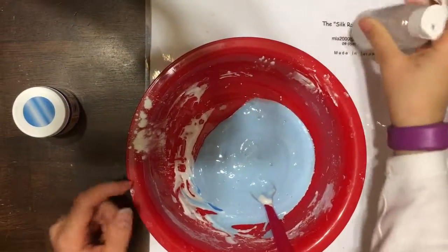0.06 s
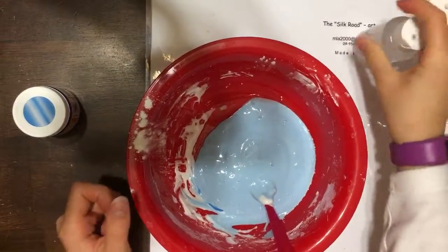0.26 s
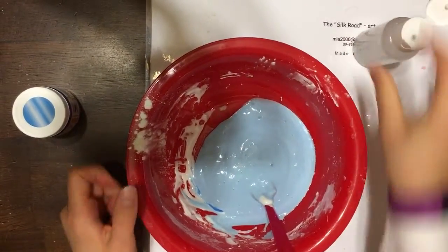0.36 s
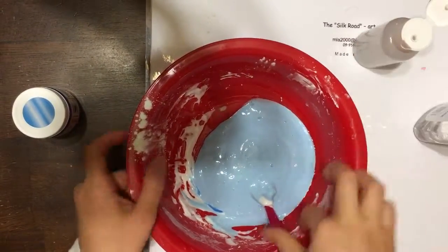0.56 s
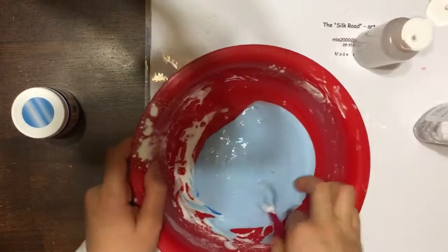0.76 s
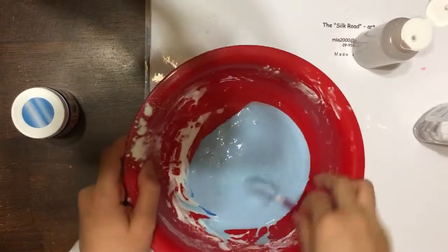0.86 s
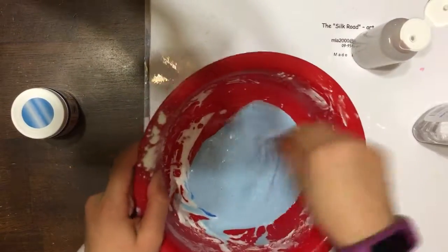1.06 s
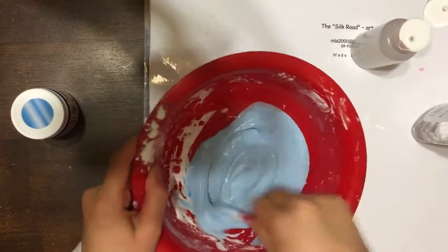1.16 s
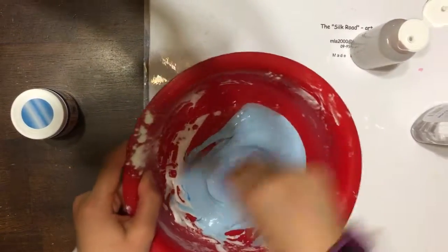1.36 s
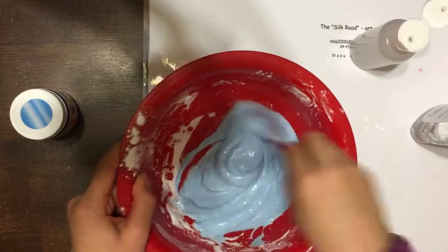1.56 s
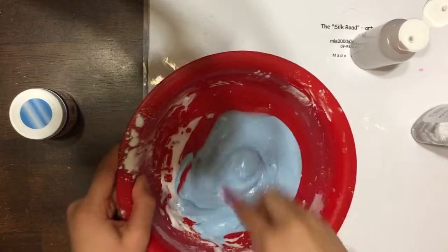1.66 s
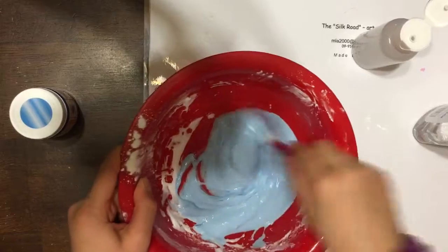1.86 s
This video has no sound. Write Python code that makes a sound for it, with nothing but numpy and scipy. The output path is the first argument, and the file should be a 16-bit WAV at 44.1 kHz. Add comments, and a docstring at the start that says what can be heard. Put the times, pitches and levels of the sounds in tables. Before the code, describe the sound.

Close up indoors, thick slime squelches and crackles faintly as a spoon stirs it, with a few wet pops; beforehand, a light plastic bottle lands with a loud thud and quick rattle on the table.

```python
"""Stirring a bowl of slime

A plastic bottle is set down on a wooden table and rocks twice: ringing modes with short noise bursts.
Fingers and a spoon tap plastic as filtered noise bursts; the bowl knocks as modes and drags as low noise.
The slime peels in showers of tiny rings over a soft crackle, and air pockets pop as sinking tones.
A small, quiet room answers with a brief noise-built echo, over a faint, steady room tone."""
import sys
import numpy as np
from scipy import signal
from scipy.fft import rfft, irfft
from scipy.io import wavfile

SR = 44100
rng = np.random.default_rng(int(sys.argv[2]) if len(sys.argv) > 2 else 0)


def dump_mix(stems):
    """Bounce the given channels to the path in sys.argv[1] as a 16-bit WAV at rate SR."""
    frames = np.atleast_2d(stems).T  # one column per channel
    limited = np.clip(frames, -1, 1)  # hard clip at full scale
    pcm = np.round(limited * 32767).astype(np.int16)
    wavfile.write(sys.argv[1], SR, pcm)


N = 83790
T = np.arange(N) / SR  # time axis [s]

# Bottle meeting the table: (time [s], thud level [dB], bottle ring level [dB], tick level [dB])
BOTTLE_LANDINGS = [(0.2062, -14.5, -31, -44.5), (0.2408, -28, -43.5, -55), (0.2780, -30, -55.5, -61.5)]
# Table top modes: (frequency [Hz], level within the thud [dB], t60 [s])
TABLE_MODES = [(244, 3.5, 0.02), (398, -12.5, 0.0092), (81.4, -35.5, 0.77), (118.5, -18, 0.4),
               (166.5, -15.5, 0.23), (211.5, -22, 0.17), (238, -26, 0.23), (285, -18, 0.13),
               (343.4, -23.5, 0.26), (368.6, -30, 0.32), (426.5, -25, 0.1), (512, -38, 0.23),
               (812, -31, 0.27), (872, -33.5, .22)]
# Bottle shell modes: (frequency [Hz], level within the ring [dB], t60 [s])
BOTTLE_MODES = [(1045, -9.5, 0.029), (1335, -12, 0.048), (1875, -24, 0.058), (2193, -6, .025),
                (3607, -7.5, 0.021), (3630, -6.5, 0.012), (5870, -7, 0.0063)]
THUD_LAG_S, THUD_RISE_S = 0.00134, 0.00097  # the table top gives way just after the contact
THUD_LOW_HZ = 98  # the table top radiates little below this
TICK_HZ, TICK_OCTAVES, TICK_T60_S = 7400, 2.0, 0.018
# The bottle's many crowded modes, as one noise burst; level relative to the ring
CLATTER_DB, CLATTER_HZ, CLATTER_OCTAVES, CLATTER_T60_S = -20, 1940, 0.64, 0.24

# Slime peeling from spoon and bowl:
# (time [s], rise [s], fall time constant [s], hollow level [dB], smack level [dB], fizz level [dB])
PEELS = [(0.816, 0.014, 0.0057, -43, -51.5, -64.5), (0.8403, 0.00056, 0.0051, -50, -59.5, -74),
         (0.881, 0.0015, .006, -58, -61, -74), (0.9, 0.0018, 0.013, -59.5, -71, -72.5),
         (1.008, 0.018, 0.075, -73, -75.5, -79), (1.068, 0.021, 0.03, -75, -97, -83),
         (1.165, 0.037, 0.015, -65.5, -68.5, -83), (1.1795, 0.00084, 0.0021, -77, -59, -67),
         (1.278, .025, 0.015, -58, -72, -87), (1.413, 0.012, 0.01, -68, -60.5, -88),
         (1.538, 0.0027, 0.0083, -48, -56, -78), (1.624, 0.03, 0.017, -77, -79, -67.5),
         (1.708, 0.024, 0.02, -76, -73.5, -65.5)]
# Hollow body, wet smack and fine fizz of the peeling slime, each made of grain families:
# (centre frequency [Hz], pitch spread [octaves], relative level [dB], t60 [s])
HOLLOW_GRAINS = [(374, .4, -16, 0.075), (1140, 0.55, -10, 0.011), (1600, 0.21, 3, 0.0088),
                 (2460, 0.3, -4, 0.0053)]
SMACK_GRAINS = [(3550, 0.47, -2.5, 0.0047), (6400, 0.58, -5, 0.0044)]
FIZZ_GRAINS = [(9700, 0.47, 0.21, 0.0013), (13400, 0.27, -2, 0.0021)]
GRAINS_PER_S, GRAIN_SPREAD_DB = 2000, 3

# Air pockets popping, the last four levels relative to the pop level:
# (time [s], start frequency [Hz], glide [octaves/s], swell time [s], pop level [dB],
#  lower mode level [dB], skin ring level [dB], snap level [dB], push level [dB])
POCKET_POPS = [(1.0661, 1565, -52, 0.0016, -36, -3.5, -28, -21, -1.5),
               (1.562, 1774, -34, 0.0019, -30.5, -10.5, -13, -22, -26),
               (1.5698, 1837, -180, 0.0023, -35.5, -12.5, -6.5, -12.5, -18),
               (1.866, 1710, -46, 0.0014, -44, 3.5, -12.5, -14.5, -0.5)]
# Ringing skin of a pocket: (frequency [Hz], relative level [dB], t60 [s])
SKIN_MODES = [(2622, 2.5, 0.015), (3710, -2, 0.013)]
LOWER_RATIO, POP_SHAPE = 0.532, 0.93  # lower mode's pitch ratio; exponent of the swell
SNAP_HZ, SNAP_OCTAVES, SNAP_T60_S = 3030, 1.05, 0.017  # the skin of the pocket tears
PUSH_HZ, PUSH_T60_S = 417, 0.0055  # the mass of slime springs back

# Effort of the soft churning under the spoon: (time [s], level [dB])
STIRRING_EFFORT = [(0.60, -107), (0.65, -69.5), (0.71, -72), (0.78, -85.5), (0.97, -76.5), (1.12, -67),
                   (1.25, -68.5), (1.33, -62.5), (1.39, -66), (1.47, -64.5), (1.53, -67.5), (1.65, -65.5),
                   (1.78, -73.5), (1.9, -70)]
# Tone of the churning: (frequency [Hz], relative spectral level [dB])
CHURN_TONE = [(150, -3.5), (350, 7.5), (600, 0.5), (900, 5.5), (1500, -1.5), (2500, -3), (4500, -12.5),
              (9000, -18.5), (16000, -29.5)]
CRACKLE_PER_S, CRACKLE_SPREAD_DB = 5000, 4

# Light contacts of fingers and spoon on plastic:
# (time [s], level [dB], centre frequency [Hz], width [octaves], t60 [s])
PLASTIC_TAPS = [(0.008, -68, 2020, 0.35, 0.48), (0.0107, -68, 9500, .5, 0.037),
                (0.020, -60, 5380, 0.21, 0.024), (0.02, -65, 10700, 1, 0.019),
                (0.133, -79, 5570, 1.4, 0.83), (0.6318, -64.5, 4560, 0.3, 0.027),
                (0.6388, -44.5, 3390, 0.66, 0.0078), (0.641, -59.5, 1940, 1.1, 0.2),
                (0.679, -65, 3980, 2.3, 0.045), (1.4094, -51, 5740, 1.14, 0.022)]
# Nudges of the bowl on the table: (time [s], level [dB])
BOWL_NUDGES = [(0.639, -46), (1.306, -57.5)]
NUDGE_RISE_S = 0.0078
# Bowl modes: (frequency [Hz], relative level [dB], t60 [s])
BOWL_MODES = [(78.6, 0, 0.228), (99.6, -3.5, 0.18), (210, -26, 0.045)]
# Bowl dragging on the table: (time [s], level [dB])
DRAG_LEVEL = [(0, -67.5), (0.6, -97), (1.0, -78.5), (1.3, -68), (1.6, -67), (1.9, -73)]
DRAG_HZ, DRAG_OCTAVES = 72.4, 0.35

# Echo of the room: (frequency [Hz], level [dB])
ECHO_LEVEL = [(60, -49.5), (250, -7), (700, -8.5), (1600, -10), (4000, -9), (8000, -10.5), (16000, -4)]
# Decay of the echo: (frequency [Hz], t60 [s])
ECHO_T60 = [(100, 0.48), (600, 0.38), (1600, 0.55), (4000, 0.33), (12000, 0.21)]
ECHO_DELAY_S = 0.0021
# Tone of the quiet room: (frequency [Hz], relative spectral level [dB])
AIR_TONE = [(25, -8), (60, -7), (200, -7.5), (400, -20), (1100, -21), (2000, -27.5), (4000, -35.5),
            (7000, -36.5), (16000, -45.5)]
AIR_DB = -68
THIN_HZ, TOP_HZ = 35, 15900  # edges of the recorder's range


def amp(db):
    """Decibels to gain."""
    return 10 ** (np.asarray(db) / 20)


def unit(x):
    """Scale by the standard deviation, giving a zero-mean sound an rms of 1."""
    return x / (np.std(x) + 1e-12)


def since(start):
    """Seconds since a moment, zero before it."""
    return np.maximum(T - start, 0)


def fade(t, t60):
    """Exponential decay by 60 dB in t60 seconds."""
    return np.exp(-np.log(1000) * t / t60)


def curve(x, points):
    """Straight lines through a table of points."""
    return np.interp(x, *np.array(points, float).T)


def over_hz(hz, points):
    """Straight lines through points on a log-frequency axis."""
    f, v = np.array(points, float).T
    return np.interp(np.log(hz), np.log(f), v)


def bins():
    """Frequencies of the spectrum's bins, held at 1 Hz or above for the logarithms."""
    return np.maximum(np.arange(N // 2 + 1) * SR / N, 1)


def colour(x, points):
    """Shape a steady sound's spectrum by (frequency [Hz], level [dB]) points; rms 1."""
    return unit(irfft(rfft(x) * amp(over_hz(bins(), points)), N))


def band(x, hz, octaves):
    """Pass a steady sound through one broad resonance; rms 1."""
    distance = np.log2(bins() / hz) / (octaves * 0.47)  # gain is halved at a distance of 1
    return unit(irfft(rfft(x) / (1 + distance ** 2), N))


def ring(modes, start):
    """Decaying modes struck at one moment."""
    t = since(start)
    return sum(amp(db) * np.sin(2 * np.pi * hz * t) * fade(t, t60) for hz, db, t60 in modes)


def burst(start, hz, octaves, t60):
    """A burst of band-shaped noise that starts at once and decays."""
    return band(rng.standard_normal(N), hz, octaves) * (T >= start) * fade(since(start), t60)


def bottle():
    """Each landing ticks, rings the bottle and thuds the table top, which radiates little deep bass."""
    thuds, shell = 0, 0
    for start, thud_db, ring_db, tick_db in BOTTLE_LANDINGS:
        thud_start = start + THUD_LAG_S
        push = 1 - np.exp(-since(thud_start) / THUD_RISE_S)
        thuds = thuds + amp(thud_db) * push * ring(TABLE_MODES, thud_start)
        clatter = amp(CLATTER_DB) * burst(start, CLATTER_HZ, CLATTER_OCTAVES, CLATTER_T60_S)
        shell = shell + amp(ring_db) * (ring(BOTTLE_MODES, start) + clatter)
        shell = shell + amp(tick_db) * burst(start, TICK_HZ, TICK_OCTAVES, TICK_T60_S)
    bass_cut = signal.butter(2, THUD_LOW_HZ, "high", fs=SR, output="sos")
    return shell + signal.sosfilt(bass_cut, thuds)


def grains(hz, octaves, t60):
    """Tiny bubbles and threads bursting, each a brief ring at its own pitch; rms 1."""
    count = int(GRAINS_PER_S * N / SR)
    starts = rng.integers(0, N, count)
    pitch = hz * 2 ** (octaves * rng.standard_normal(count) / 2)
    pitch = np.minimum(pitch, 0.45 * SR)
    size = amp(GRAIN_SPREAD_DB * np.minimum(rng.exponential(size=count), 5))
    size = size * np.sign(rng.standard_normal(count))
    k = np.arange(int(t60 * SR) + 2)  # samples within one grain
    waves = size[:, None] * np.sin(2 * np.pi * pitch[:, None] * k / SR) * fade(k / SR, t60)
    places = starts[:, None] + k
    return unit(np.bincount(places.ravel(), waves.ravel(), N)[:N])


def squelches():
    """Peeling slime bursts into grains: a hollow body, a wet smack and a fine fizz."""
    rows, out = np.array(PEELS), 0
    shapes = np.array([np.minimum(since(start) / rise, 1) * np.exp(-since(start + rise) / fall)
                       for start, rise, fall in rows[:, :3]])
    for levels_db, families in zip(rows[:, 3:].T, (HOLLOW_GRAINS, SMACK_GRAINS, FIZZ_GRAINS)):
        texture = unit(sum(amp(db) * grains(hz, octaves, t60) for hz, octaves, db, t60 in families))
        envelope = amp(levels_db) @ shapes  # all peels summed
        out = out + envelope * texture
    return out


def pops():
    """A pocket snaps open: two cavity modes swell, sink in pitch and die as the mass springs back."""
    out = 0
    for start, hz, glide, length, db, lower_db, skin_db, snap_db, push_db in POCKET_POPS:
        t = since(start)
        phase = 2 * np.pi * np.cumsum(hz * 2 ** (glide * t) * (t > 0)) / SR
        swell = (t / length * np.exp(1 - t / length)) ** POP_SHAPE
        swell = swell * np.exp(-(t / (2.38 * length)) ** 4)  # cuts the tail short
        cavity = swell * (np.sin(phase) + amp(lower_db) * np.sin(LOWER_RATIO * phase))
        skin = amp(skin_db) * ring(SKIN_MODES, start)
        snap = amp(snap_db) * burst(start, SNAP_HZ, SNAP_OCTAVES, SNAP_T60_S)
        push = ring([(PUSH_HZ, push_db, PUSH_T60_S)], start + length)
        out = out + amp(db) * (cavity + skin + snap + push)
    return out


def crackle():
    """Dense tiny snaps of sticky threads, a few much larger than the rest."""
    size = amp(CRACKLE_SPREAD_DB * np.minimum(rng.exponential(size=N), 5))
    snaps = rng.random(N) < CRACKLE_PER_S / SR
    return snaps * size * np.sign(rng.standard_normal(N))


def churning():
    """The soft wet grain of the mass: coloured crackle following the effort of stirring."""
    return amp(curve(T, STIRRING_EFFORT)) * colour(crackle(), CHURN_TONE)


def handling():
    """Fingers and spoon tap the plastic; the bowl rings low when nudged and rumbles when dragged."""
    taps = sum(amp(db) * burst(start, hz, octaves, t60) for start, db, hz, octaves, t60 in PLASTIC_TAPS)
    nudges = sum(amp(db) * ring(BOWL_MODES, start) * np.minimum(since(start) / NUDGE_RISE_S, 1)
                 for start, db in BOWL_NUDGES)
    drag = amp(curve(T, DRAG_LEVEL)) * band(rng.standard_normal(N), DRAG_HZ, DRAG_OCTAVES)
    return taps + nudges + drag


def room(x):
    """Diffuse echo of a small room: a noise tail in which each octave decays at its own rate."""
    noise, tail = rfft(rng.standard_normal(N)), 0
    for hz in 62.5 * 2 ** np.arange(9):
        t60 = over_hz(hz, ECHO_T60)
        overlap = np.maximum(1 - abs(np.log2(bins() / hz)), 0)  # neighbouring octaves crossfade
        octave = irfft(noise * overlap, N)
        energy = np.sqrt(2 * np.log(1000) / (t60 * SR))  # offsets the extra energy of a longer decay
        tail = tail + amp(over_hz(hz, ECHO_LEVEL)) * octave * fade(since(ECHO_DELAY_S), t60) * energy
    return signal.fftconvolve(x, tail * (T > ECHO_DELAY_S))[:N]


def room_tone():
    """The steady hush of the room: coloured noise."""
    return amp(AIR_DB) * colour(rng.standard_normal(N), AIR_TONE)


def scene():
    """All sources close to the microphone, with the room's echo and tone."""
    near = bottle() + handling() + pops() + squelches() + churning()
    return (near + room(near) + room_tone())[None]


def record(dry):
    """The recorder thins the deep bass gently and cuts the top steeply."""
    thin = signal.sosfilt(signal.butter(1, THIN_HZ, "high", fs=SR, output="sos"), dry)
    return signal.sosfilt(signal.ellip(8, 0.2, 70, TOP_HZ, fs=SR, output="sos"), thin)


dry = scene()
out = record(dry)
dump_mix(out)
```